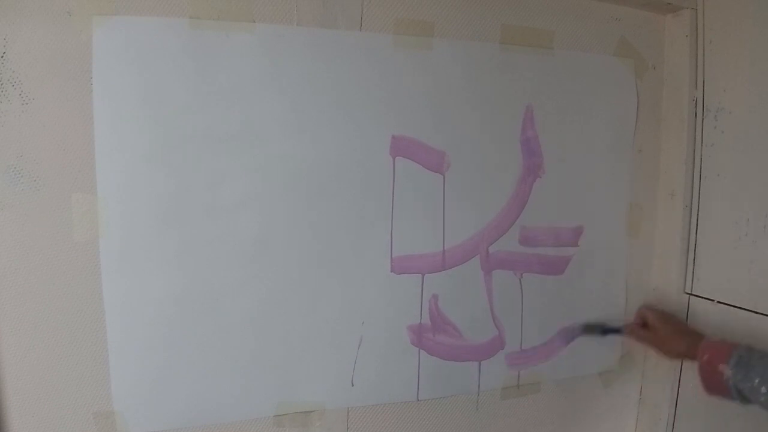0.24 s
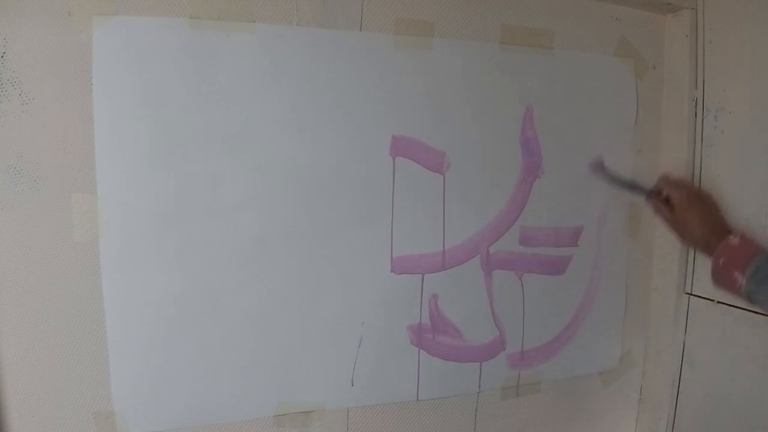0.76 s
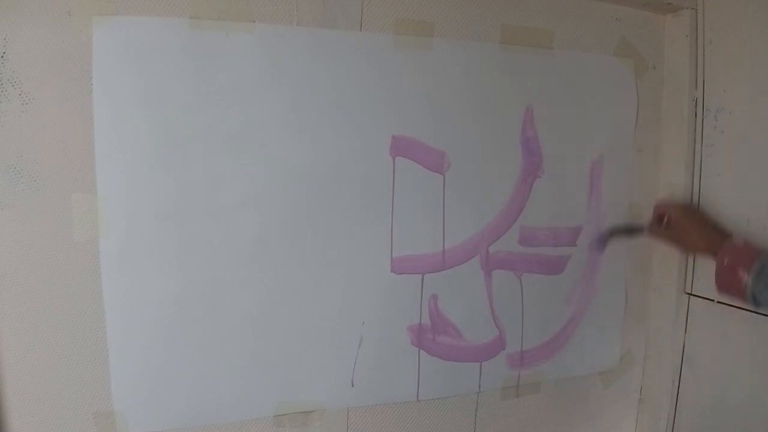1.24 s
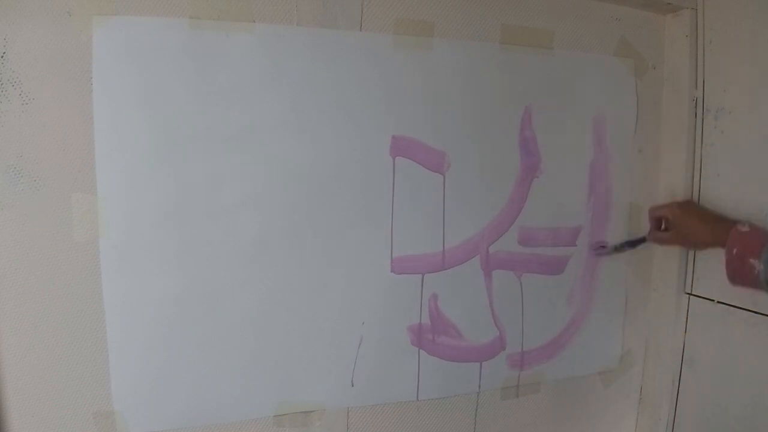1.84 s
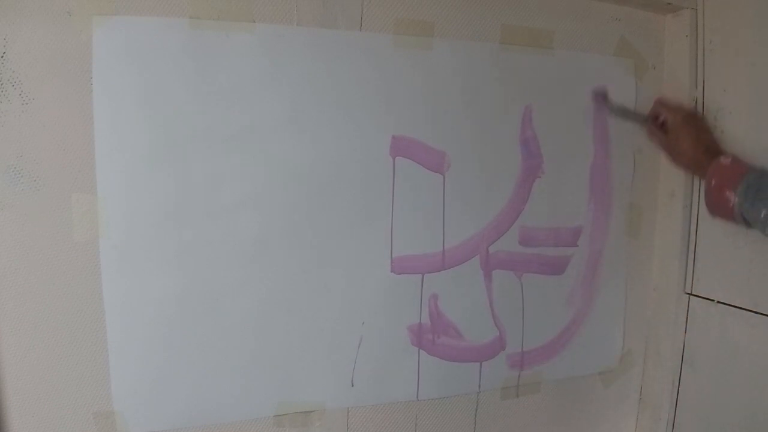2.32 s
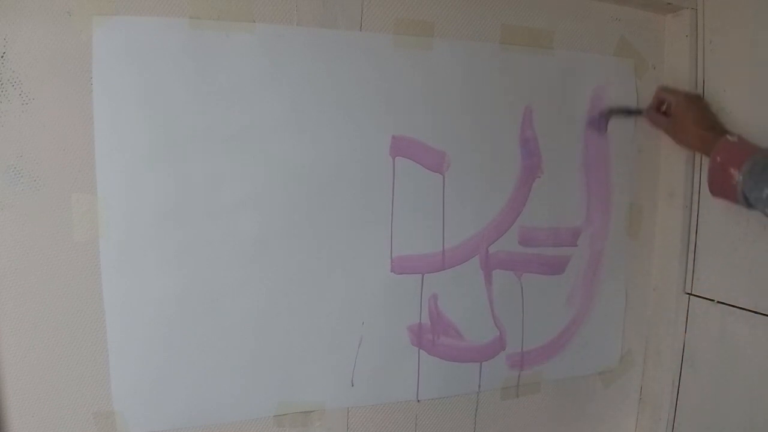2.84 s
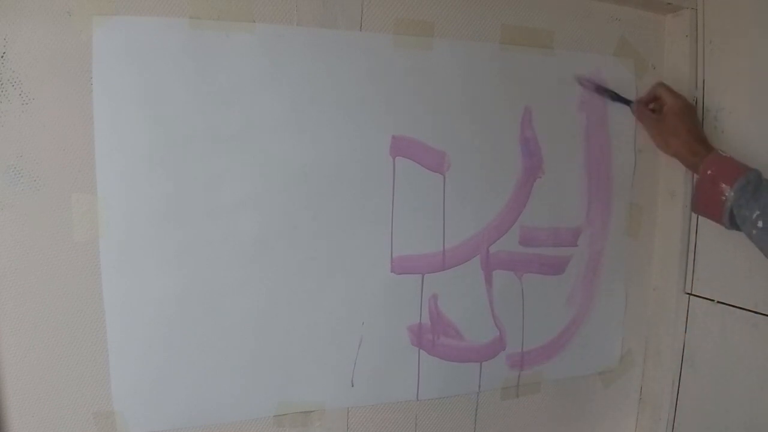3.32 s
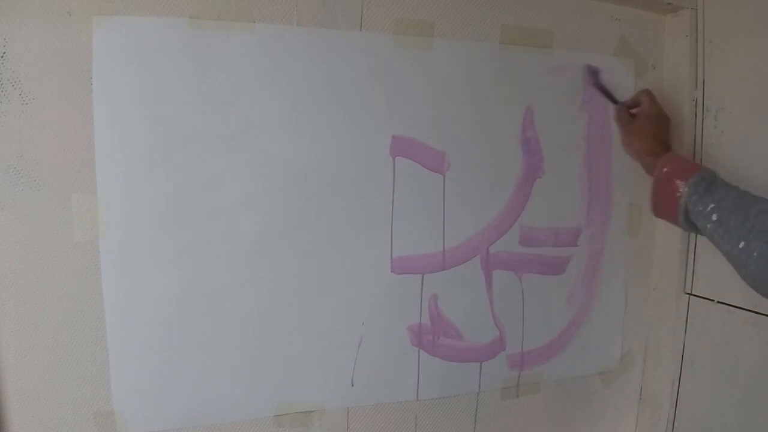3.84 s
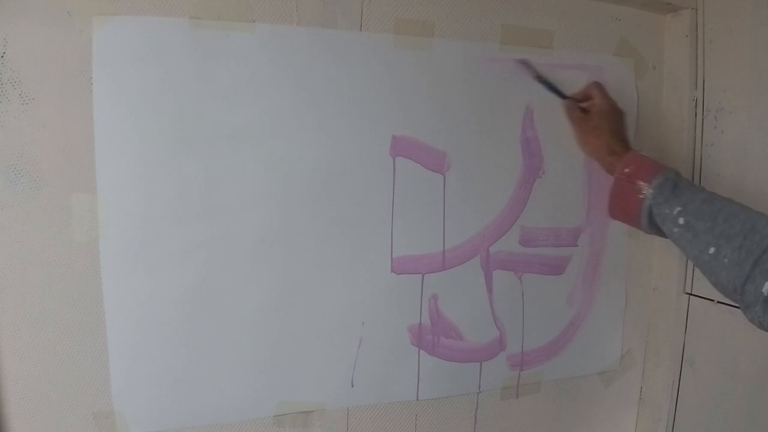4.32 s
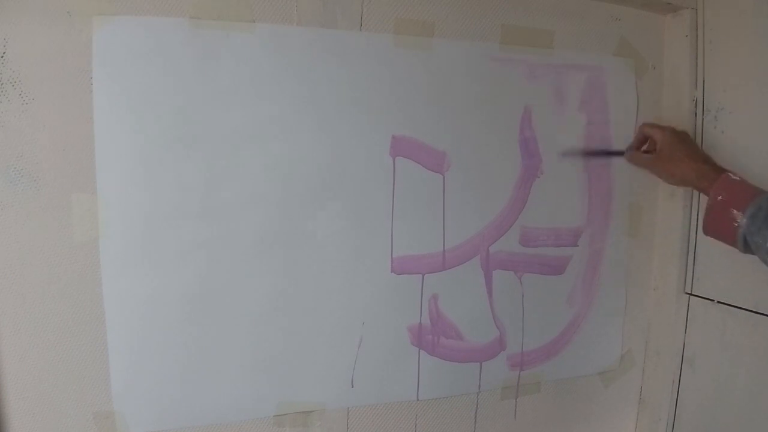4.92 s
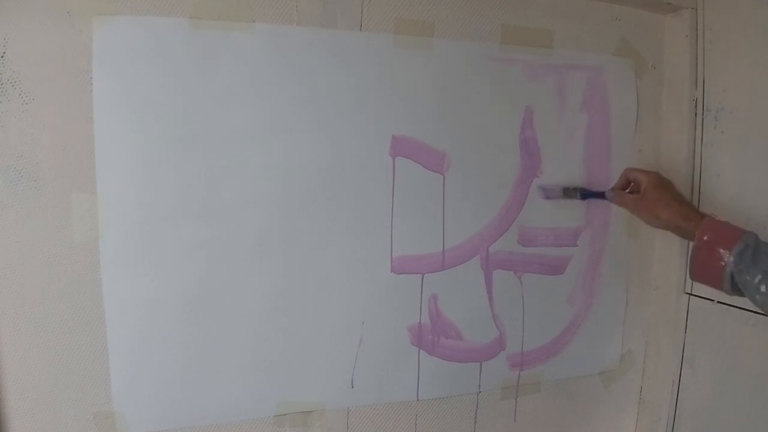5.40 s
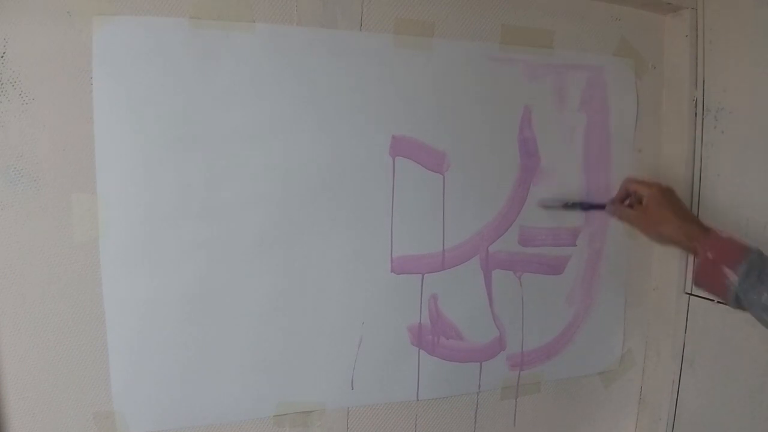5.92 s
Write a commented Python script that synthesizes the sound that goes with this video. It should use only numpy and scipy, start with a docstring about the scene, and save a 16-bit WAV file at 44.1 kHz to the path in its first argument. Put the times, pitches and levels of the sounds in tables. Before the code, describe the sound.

A wet paintbrush is dragged back and forth over a large sheet of paper taped to a wall. The soft, scratchy strokes follow each other with tiny gaps, while the loose sheet rustles and bumps dully. Light taps and brief squeaks mark some turns, with the sharpest taps near the end. The sound sits slightly to the right in a small hard room with a faint low hum.

```python
"""Wet brush on a paper sheet

A wet brush is dragged to and fro over a big sheet taped to a wall in a small hard room. Bristles slip
over the grain thousands of times a second and at times squeak; the loose sheet rustles, flaps and thuds
under the pressure; the ferrule taps at some turns. A far, low hum wavers under a faint room floor."""
import sys
import numpy as np
from scipy import signal
from scipy.fft import rfft, irfft, next_fast_len
from scipy.io import wavfile

SR = 44100
rng = np.random.default_rng(int(sys.argv[2]) if len(sys.argv) > 2 else 0)


def unload_audio(sound):
    """Save the sound as a 16-bit wav file, at the path given as the first command line argument."""
    columns = np.transpose(np.atleast_2d(sound))
    # keep every value between -1 and 1, then stretch to whole-number steps
    steps = np.round(np.clip(columns, -1, 1) * 32767)
    wavfile.write(sys.argv[1], SR, steps.astype(np.int16))


N = 271654
TIME_S = np.arange(N) / SR
BIN_HZ = np.maximum(np.arange(N // 2 + 1) * SR / N, 1)

# sharp taps of the brush and, in the low-pitched rows, dull thuds of the sheet slapping the wall:
# t/s, knock peak/dB, f/Hz, crack/dB re knock, thump/dB re knock, knock t60/s, patter re first touch
TAPS_AND_THUDS = [(0.004, -45.5, 1200, -3, -31, 0.012, 0.3), (0.66, -48, 1850, -12, -24, .011, .3),
                  (0.673, -55, 1830, -5, -36, .011, 0.2), (1.432, -54.5, 503, -25, 5.5, 0.0085, 0.35),
                  (1.997, -41, 1430, -17, -38, .011, 0.06), (2.167, -50.5, 484, -25, 4.5, 0.013, 0),
                  (2.19, -48, 456, -25, -5, .008, 0.03), (2.307, -42, 1600, -16, -30, 0.0065, 0.09),
                  (2.34, -37.5, 1380, -14, -6.5, 0.0068, 0.1), (2.898, -50, 1620, -10, -18, .008, 0),
                  (3.007, -42, 2000, 3, -36, 0.01, 0.24), (3.209, -47, 1487, -19, -36, 0.012, .1),
                  (3.334, -52, 550, -25, -7, 0.013, .2), (3.318, -46, 1490, -3, -25, .011, .5),
                  (3.413, -45.5, 1685, -17, -30, 0.01, 0.2), (4.627, -40.5, 1874, -10, -43, 0.0089, 0.03),
                  (4.991, -42, 2630, -16, -45, 0.0086, 0.4), (5.319, -34, 2240, -10, -45, 0.012, 0.07),
                  (5.376, -35, 3560, -4, -15, 0.0094, .1), (5.697, -44, 1140, -3, -28, .005, 0.07)]


def from_db(db):
    """Decibels to gain."""
    return 10 ** (np.asarray(db) / 20)


def unit_rms(x):
    """Scale to rms 1."""
    return x / np.sqrt(np.mean(x ** 2) + 1e-20)


def in_time(rows):
    """Columns of a time table, per sample."""
    times_s, *columns = np.transpose(rows)
    return [np.interp(TIME_S, times_s, column) for column in columns]


def at_bins(rows):
    """Spectrum table, per FFT bin."""
    hz, values = np.transpose(rows)
    return np.interp(np.log(BIN_HZ), np.log(hz), values)


def colour(x, gain):
    """Weight each FFT bin."""
    return irfft(rfft(x) * gain, N)


def drift(rate_hz):
    """Slow random wander, rms 1."""
    step, settle = 40, 2000
    r = np.exp(-2 * np.pi * rate_hz * step / SR)
    noise = rng.standard_normal(N // step + settle + 2)
    slow = signal.lfilter([1], [1, -2 * r, r * r], noise)[settle:]
    return np.interp(np.arange(N) / step, np.arange(len(slow)), unit_rms(slow))


def ring(force, hz, t60_s):
    """Damped mode: a unit click starts a sine of height 1."""
    r, w = from_db(-60 / (t60_s * SR)), 2 * np.pi * hz / SR
    return signal.lfilter([0, np.sin(w)], [1, -2 * r * np.cos(w), r * r], force)


def moving_ring(x, hz, width_hz):
    """Unity-gain resonance with a gliding centre."""
    out, state, block = np.zeros(N), np.zeros(2), 128
    r = np.exp(-np.pi * width_hz / SR)
    zeros = np.array([1, 0, -1]) * (1 - r * r) / 2
    for i in range(0, N, block):
        poles = [1, -2 * r * np.cos(2 * np.pi * hz[i] / SR), r * r]
        out[i:i + block], state = signal.lfilter(zeros, poles, x[i:i + block], zi=state)
    return out


def clicks(per_s, spread_db, clump_db):
    """Random clicks of uneven size, in clumps."""
    sizes = from_db(spread_db * np.minimum(rng.exponential(1, N), 5)) * rng.choice([-1, 1], N)
    fires = rng.random(N) < per_s / SR
    return sizes * fires * from_db(clump_db * drift(rate_hz=70))


def diffuse_noise(gain):
    """Stereo noise, alike in the bass, unlike in the treble."""
    # diffuse field: f/Hz, left-right coherence
    coherence = [(60, 0.71), (300, 0.55), (700, 0.3), (1500, 0.25), (4000, 0.056)]
    alike = at_bins(coherence)
    mid, side = rfft(rng.standard_normal((2, N))) * gain
    return irfft(np.sqrt(1 + alike) * mid + np.sqrt(1 - alike) * side * [[1], [-1]], N)


def room_floor():
    """Building rumble over microphone hiss."""
    # floor spectrum: f/Hz, relative level/dB
    spectrum = [(12, -34), (20, -9), (60, 7), (146, -6.5), (177, -11.5), (228, -40), (301, -17),
                (558, -27.5), (13500, -28), (16000, -25.5)]
    return from_db(-67.5) * unit_rms(diffuse_noise(from_db(at_bins(spectrum))))


def far_hum():
    """Low wandering tone that blurs into narrow-band noise."""
    # hum course: t/s, f/Hz, level/dB
    course = [(0.0, 65.8, -59), (0.45, 66.7, -58.5), (0.56, 68.4, -61.5), (0.63, 68.6, -74),
              (0.76, 68.6, -69), (0.85, 68.3, -62), (1.2, 69.6, -63), (2.1, 72.8, -61.5),
              (2.45, 73.1, -64.5), (2.66, 76.8, -62.5), (3.23, 51.5, -69.5), (3.34, 63, -57),
              (3.5, 63.4, -63), (3.67, 50.14, -61), (3.86, 61.4, -68), (4.19, 57, -63.5),
              (4.29, 69.3, -64.5), (4.56, 67.9, -71), (4.67, 84.7, -63), (4.84, 84.7, -71),
              (4.94, 69.4, -82), (5.39, 58.54, -65), (5.87, 91.8, -73), (6.0, 68, -75), (6.16, 76.4, -79)]
    # hum roughness: t/s, noise amount (0 tone, 1 noise)
    roughness = [(0, 0.2), (0.55, 0.18), (0.7, 0.41), (1.0, 0.25), (2.1, 0.43), (2.4, 0.77), (3.2, 0.51),
                 (3.35, 0.4), (3.8, 0.74), (6.16, 0.98)]
    hz, level_db = in_time(course)
    rough, = in_time(roughness)
    carrier = np.exp(2j * np.pi * np.cumsum(hz) / SR)
    noise = drift(rate_hz=25) + 1j * drift(rate_hz=25)
    amplitude = np.sqrt(2 - 2 * rough ** 2) + rough * noise
    return from_db(level_db) * (carrier * amplitude).real


def room_echoes(x):
    """Bright early echoes and a dull tail; the pattern keeps changing as the brush moves."""
    places, place_s = 12, 0.022
    early_t60_s, late_t60_s, late_db, wall_cut_hz = 0.033, 0.34, -17, 2700
    length = N // places
    delay_s, fft_size = TIME_S[:length], next_fast_len(N + length)
    bright = diffuse_noise(0.9)
    dull = diffuse_noise(1 / np.sqrt(1 + (BIN_HZ / wall_cut_hz) ** 6))
    onset = np.clip((delay_s - 0.002) / 0.001, 0, 1)
    spectrum = 0
    for k in range(places):
        span = slice(k * length, (k + 1) * length)
        early = bright[:, span] * from_db(-60 * delay_s / early_t60_s)
        late = dull[:, span] * from_db(late_db - 60 * delay_s / late_t60_s)
        response = (early + late) * onset
        response /= np.sqrt(np.sum(response ** 2) / 2)
        turn = (TIME_S / place_s - k) % places
        crossfade = np.sin(np.pi * np.clip(turn / 2, 0, 1))   # equal power
        spectrum = spectrum + rfft(response, fft_size) * rfft(x * crossfade, fft_size)
    return irfft(spectrum, fft_size)[:, :N]


def sheet_flaps():
    """The loose sheet slaps the wall in swells of dull knocks; the board behind rings hollow."""
    # flaps: t/s, peak/dB, length/s
    flaps = [(0.0, -65, 0.039), (0.47, -66, 0.34), (0.947, -64, 0.51), (1.43, -58.5, 0.15),
             (1.692, -58, 0.32), (2.153, -54, 0.2), (2.372, -56, 0.2), (2.49, -61, 0.21),
             (2.729, -66, 0.14), (2.926, -59, 0.42), (3.07, -60, 0.28), (3.344, -57, 0.11),
             (3.474, -52.5, 0.078), (4.026, -72, 0.083), (4.607, -68.5, 0.18), (4.788, -63.5, 0.11),
             (5.144, -70.5, 0.045), (5.342, -74, 0.058), (5.408, -62.5, 0.26), (5.583, -71.5, 0.61)]
    # stirring between flaps: t/s, level/dB
    stirring = [(0, -80.5), (1.3, -71), (3.5, -75.5), (3.8, -81.5), (6.16, -83.5)]
    # slap spectrum: f/Hz, relative level/dB
    spectrum = [(53, -27), (90, -1), (184, -6.5), (294, -10.5), (441, -10), (495, -13.5), (900, -15.5),
                (1170, -26), (1980, -120)]
    # board modes: f/Hz, width/Hz, gain/dB
    board_modes = [(133, 20, 3.5), (227, 57, -4), (278, 29, -10), (344.5, 13, 3.5)]
    drop_db, rise_share = 29, 0.89
    level_db, = in_time(stirring)
    for peak_s, peak_db, length_s in flaps:
        away_s = np.maximum(TIME_S - peak_s, (peak_s - TIME_S) / rise_share)
        level_db = np.maximum(level_db, peak_db - drop_db * away_s / length_s)
    hollow = 1 + sum(from_db(db) / (1 + (2 * (BIN_HZ - hz) / width_hz) ** 2)
                     for hz, width_hz, db in board_modes)
    slaps = clicks(per_s=600, spread_db=2.5, clump_db=-1.14)
    return from_db(level_db) * unit_rms(colour(slaps, hollow * from_db(at_bins(spectrum))))


def squeaks():
    """Slips briefly catch one narrow resonance."""
    # squeaks: t/s, length/s, f/Hz, level/dB
    events = [(0.678, 0.041, 1780, -54.5), (0.699, 0.024, 4220, -42.5), (0.79, 0.029, 4530, -48),
              (2.012, 0.033, 1320, -56), (3.463, 0.029, 3070, -49), (3.466, 0.025, 4480, -61),
              (5.299, 0.041, 4040, -62.5), (5.594, 0.086, 4070, -49.5)]
    width_hz, half = 68, SR // 8
    t60_s = np.log(1000) / (np.pi * width_hz)
    t, out = np.arange(-half, half) / SR, np.zeros(N)
    for centre_s, length_s, hz, db in events:
        puff = np.exp(-(2 * t / length_s) ** 4)
        tone = puff * ring(rng.standard_normal(len(t)), hz, t60_s)
        i = round(centre_s * SR)
        out[i - half:i + half] += from_db(db) * unit_rms(tone) / unit_rms(puff).max()
    return out


def taps_and_thuds():
    """Sharp brush taps and dull thuds of the sheet slapping the wall: dry knock, crack, wall thump."""
    # sheet modes: pitch ratio, gain/dB, t60 ratio
    modes = [(1.0, 0, 1.0), (.74, -6, .64), (1.42, -5, .55), (2.1, -6, .5)]
    contact_s, crack_hz, crack_t60_s = 0.006, 4500, 0.0015
    out, length = np.zeros(N + SR), SR // 8
    contact = np.exp(-TIME_S[:length] / contact_s)
    for start_s, peak_db, hz, crack_db, thump_db, t60_s, patter in TAPS_AND_THUDS:
        force = patter * rng.standard_normal(length) * contact
        force[0] = 1   # hard first touch, then dying patter
        knock = sum(from_db(db) * ring(force, hz * ratio, share * t60_s) for ratio, db, share in modes)
        knock = ring(knock, hz, t60_s=0.001)   # dulls the treble
        knock = signal.sosfilt(signal.butter(4, 0.64 * hz, "high", fs=SR, output="sos"), knock)
        crack = ring(ring(force, crack_hz, crack_t60_s), crack_hz, crack_t60_s)
        thump = ring(contact ** 8, hz=283, t60_s=0.057)
        i = round(start_s * SR)
        for part, db in (knock, 0), (crack, crack_db), (thump, thump_db):
            out[i:i + length] += from_db(peak_db + db) * part / np.abs(part).max()
    return out[:N]


def hand_motion():
    """Strokes and pressure surges set the scrape, hiss and rustle levels and the sheet resonance."""
    # strokes: start/s, end/s, then start and end of scrape/dB, hiss/dB re scrape, rustle/dB; sheet f/Hz
    strokes = [(0.0, 0.212, -60.5, -58.5, 4, -11.5, -65.5, -71, 2070),
               (0.208, 0.527, -53, -47.5, -2, 0, -64.5, -65, 1870),
               (0.657, 1.002, -56, -47, -3, -0.5, -65.5, -59, 1730),
               (1.097, 1.466, -51, -50.5, -5, -2.5, -64, -66, 1910),
               (1.546, 1.821, -50, -50.5, -0.5, -5, -58.5, -61.5, 1710),
               (1.882, 2.197, -54.5, -47.5, -3.5, -1.5, -65.5, -62, 1820),
               (2.263, 2.479, -49, -53.5, -3.5, -7.5, -67.5, -59, 1570),
               (2.447, 2.942, -53, -52.5, -2, -7, -65.5, -64, 1785),
               (3.019, 3.147, -48.5, -56, -4.5, -3.5, -53.5, -63.5, 1670),
               (3.22, 3.223, -47.5, -47.5, -5, -3.5, -56.5, -59.5, 1923),
               (3.317, 3.364, -48, -64, -2, -12, -56.5, -78, 1560),
               (3.41, 3.685, -51.5, -48.5, 0, -2.5, -62, -63.5, 1800),
               (3.786, 4.125, -49.5, -52.5, -3, -0.5, -64.5, -58, 1780),
               (4.22, 4.36, -51, -56, 1, -0.5, -60, -66, 1763),
               (4.349, 4.476, -62, -47.5, 5, -3, -62, -61, 2040),
               (4.602, 4.838, -52.5, -55, -3.5, -9, -60.5, -70, 1870),
               (4.996, 5.161, -58.5, -49, -4, 1, -65, -63.5, 1750),
               (5.318, 5.37, -58, -56.5, -20, -5, -67, -63.5, 2124),
               (5.374, 5.504, -43.5, -49, 1, -3, -63, -62.5, 2060),
               (5.566, 5.657, -50, -49, -6.5, -6.5, -69, -58.5, 1036),
               (5.728, 5.812, -53, -46, 1.5, -1.5, -55.5, -72.5, 1113)]
    # the hand presses or eases: t/s, scrape/dB, hiss/dB, rustle/dB, length/s
    surges = [(0.38, 3, -2, 2, 0.096), (0.459, 1, 0, 6, 0.051), (0.706, 5.5, 8.5, -0.5, 0.061),
              (0.947, 0, -2.5, 2, 0.086), (1.2, -1, -0.5, 5.5, 0.035), (1.37, 3, 3, 2, 0.064),
              (1.427, 6.5, 7, 11.5, 0.061), (1.996, -4.5, -3, 2.5, 0.056), (2.166, 2, 3, 7, 0.033),
              (2.324, 2, 3, 8, 0.058), (2.525, 7.5, 4.5, 10, 0.059), (2.906, 5.5, 11, 4, .1),
              (3.462, 8, 6, 9, 0.028), (3.909, 2.5, 2.5, -3.5, 0.087), (4.775, 8.5, 8.5, 6.5, 0.14),
              (4.883, 4.5, 9, 9, 0.085), (5.098, 6.5, 2, 4, 0.14), (5.468, 2.5, 3.5, 3, 0.062),
              (5.793, -3.5, -11, 6.5, 0.036)]
    # rows: scrape, hiss, rustle
    rise_db_per_s, fall_db_per_s = np.vstack([384, 477, 477]), np.vstack([238, 306, 258])
    landing_loss_db = np.vstack([6.5, 21.5, -7])   # brush still slow, sheet jolted
    landing_db_per_s, speed_up_s, arch_db_per_s = 9000, 0.044, 9
    levels_db = np.full((3, N), -100.0)
    for start_s, end_s, scrape0, scrape1, hiss0, hiss1, rustle0, rustle1, _ in strokes:
        tap_s = min((hit[0] for hit in TAPS_AND_THUDS), key=lambda s: abs(s - start_s))
        if abs(tap_s - start_s) < 0.009:   # opens on a tap: starts at once, then gathers speed
            start_s = tap_s
            onset_db = landing_db_per_s * np.maximum(start_s - TIME_S, 0)
            onset_db = onset_db + landing_loss_db * np.exp(-np.maximum(TIME_S - start_s, 0) / speed_up_s)
        else:
            onset_db = rise_db_per_s * np.maximum(start_s - TIME_S, 0)
        release_db = fall_db_per_s * np.maximum(TIME_S - end_s, 0)
        along = np.clip((TIME_S - start_s) / (end_s - start_s), 0, 1)
        arch_db = arch_db_per_s * (end_s - start_s) * np.sin(np.pi * along)   # fastest in mid-stroke
        scrape_db = scrape0 + along * (scrape1 - scrape0)
        hiss_db = scrape_db + hiss0 + along * (hiss1 - hiss0) + arch_db
        rustle_db = rustle0 + along * (rustle1 - rustle0)
        stroke_db = np.array([scrape_db, hiss_db, rustle_db]) - onset_db - release_db
        levels_db = np.maximum(levels_db, stroke_db)
    for centre_s, *lifts_db, length_s in surges:
        levels_db += np.vstack(lifts_db) * np.exp(-(2 * (TIME_S - centre_s) / length_s) ** 2)
    sheet_hz, = in_time([(s, stroke[-1]) for stroke in strokes for s in stroke[:2]])
    return *levels_db, sheet_hz


def brush(scrape_db, hiss_db, rustle_db, sheet_hz):
    """One stream of bristle slips sounds as sheet rustle, grain scrape and tip hiss."""
    # slip spectrum: f/Hz, relative level/dB
    spectrum = [(290, -10), (500, -8), (697, -11), (944, -1), (1240, 2), (1590, 2.5), (2000, 1),
                (2350, 5.5), (2870, -0.5), (4630, -10.5), (5750, -10), (7350, -19), (9300, -13.5),
                (12200, -10.5), (15100, -15), (15800, -20)]
    # ring of the bent bristles, moving with speed and pressure: t/s, f/Hz
    bristle_ring = [(0.0, 4400), (0.05, 4340), (0.15, 4600), (0.52, 4800), (0.66, 4000), (0.89, 4860),
                    (0.93, 4490), (1.03, 4905), (1.08, 4485), (1.31, 5000), (1.44, 4530), (1.49, 4150),
                    (1.53, 4600), (2.12, 4585), (2.15, 5100), (2.43, 4420), (2.5, 5230), (2.55, 4400),
                    (2.82, 4506), (2.94, 5210), (3.02, 4520), (3.12, 4720), (3.17, 4250), (3.2, 4840),
                    (3.25, 4700), (3.32, 4180), (3.37, 4620), (3.4, 3580), (3.45, 4480), (3.62, 5040),
                    (3.71, 4230), (3.93, 5350), (4.01, 4440), (4.72, 4710), (4.9, 4240), (4.98, 3520),
                    (5.03, 4350), (5.16, 5076), (5.32, 3835), (5.39, 3810), (5.45, 4915), (5.6, 4090),
                    (5.88, 5275), (5.9, 4890)]
    rustle_top_hz, hiss_foot_hz, flick_foot_hz, waver_db = 3317, 7800, 12900, 0.97
    slips = colour(clicks(per_s=7000, spread_db=2.5, clump_db=1.04), from_db(at_bins(spectrum)))
    low = 1 / (1 + (BIN_HZ / rustle_top_hz) ** 8)
    high = 1 / (1 + (hiss_foot_hz / BIN_HZ) ** 12)
    rustle, scrape, hiss = (unit_rms(colour(slips, band)) for band in (low, 1 - low - high, high))
    bristle_hz = in_time(bristle_ring)[0] * (1 + 0.072 * drift(rate_hz=14.6))
    scrape = unit_rms(scrape + from_db(7) * moving_ring(scrape, bristle_hz, width_hz=750))
    # the sheet's free span sets its ring
    rustle = unit_rms(rustle + from_db(3) * moving_ring(rustle, sheet_hz, width_hz=500))
    # single tips spring free in bright flicks, louder with a faster brush
    flicks = clicks(per_s=1700, spread_db=1.0, clump_db=2.0)
    flicks = unit_rms(colour(flicks, 1 / (1 + (flick_foot_hz / BIN_HZ) ** 12)))
    flick_db = -7 + 0.76 * (hiss_db + 66)
    hiss = hiss + from_db(flick_db) * flicks
    layers = (scrape_db, scrape), (hiss_db, hiss), (rustle_db, rustle)
    return sum(from_db(db + waver_db * drift(rate_hz=6.3)) * layer for db, layer in layers)


def scene():
    """Wall on the right: the left side hears it later, weaker, and partly from elsewhere on the sheet."""
    # balance: f/Hz, left re right/dB
    balance = [(60, -2), (150, -3), (380, -8), (950, -5), (2380, -1.5), (5980, -2.5), (15000, -4)]
    shared_power, left_lag_s, accent_send_db = 0.3, 0.00017, -11
    motion = hand_motion()
    brush_right, brush_elsewhere = brush(*motion), brush(*motion)
    brush_left = np.sqrt(shared_power) * brush_right + np.sqrt(1 - shared_power) * brush_elsewhere
    accents = taps_and_thuds() + squeaks()
    paper = np.array([brush_left, brush_right]) + sheet_flaps()
    direct = paper + accents
    direct[0] = colour(direct[0], np.exp(-2j * np.pi * BIN_HZ * left_lag_s))
    echoes = room_echoes(paper + from_db(accent_send_db) * accents)
    tilt = from_db(at_bins(balance) / 2)
    return colour(direct + echoes, np.array([tilt, 1 / tilt])) + far_hum() + room_floor()


def record(dry):
    """Steep low-pass."""
    cutoff_hz = 15830
    return signal.sosfilt(signal.ellip(14, 0.5, 65, cutoff_hz, fs=SR, output="sos"), dry)


dry = scene()
out = record(dry)
unload_audio(out)
```